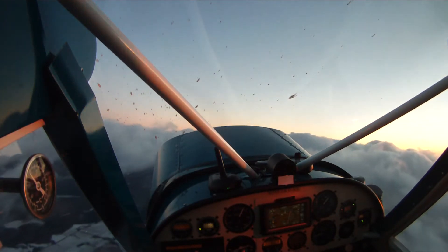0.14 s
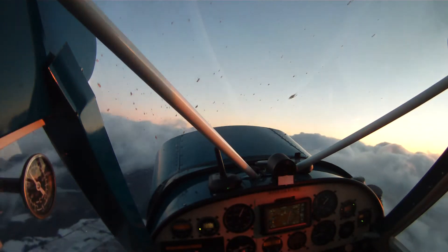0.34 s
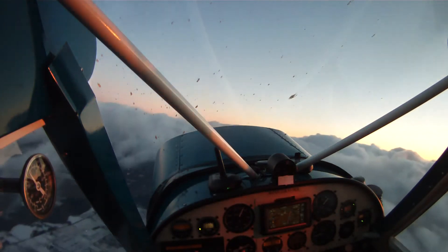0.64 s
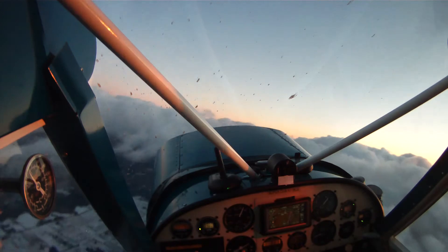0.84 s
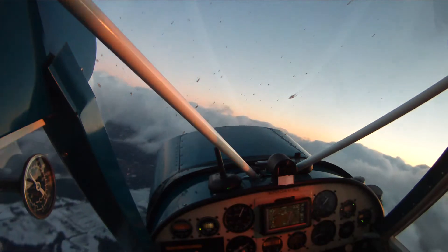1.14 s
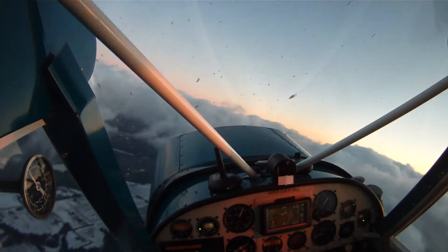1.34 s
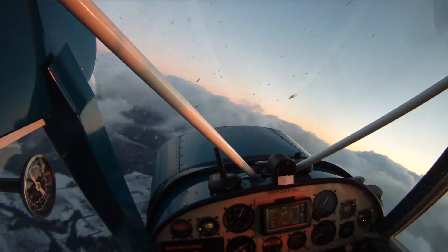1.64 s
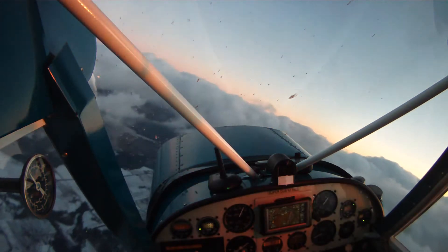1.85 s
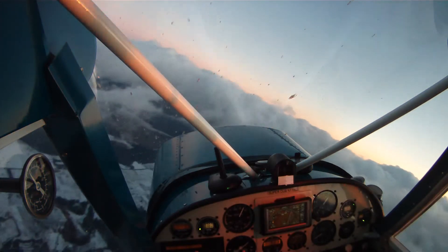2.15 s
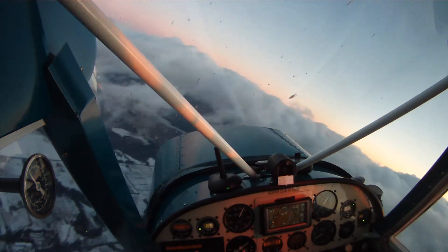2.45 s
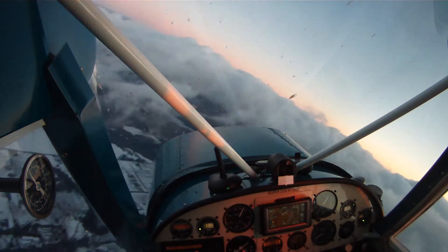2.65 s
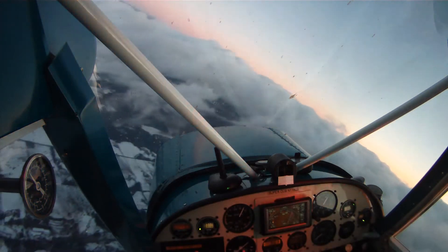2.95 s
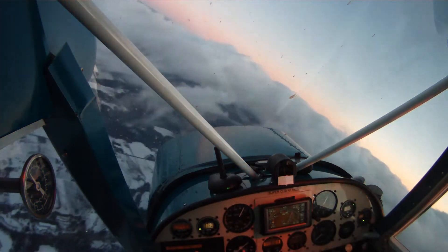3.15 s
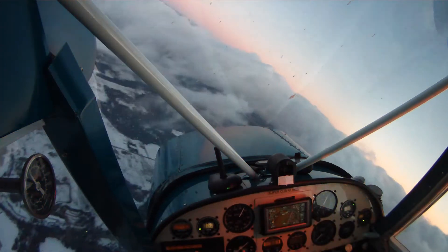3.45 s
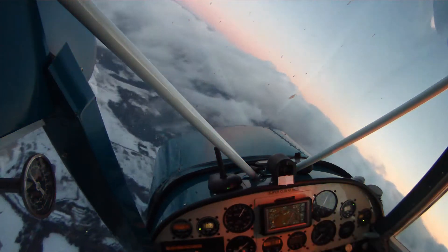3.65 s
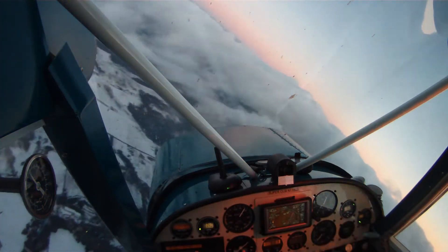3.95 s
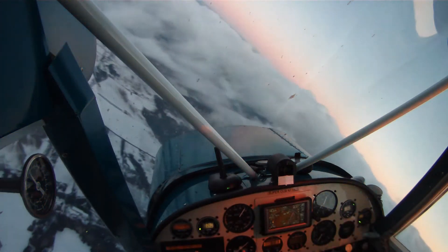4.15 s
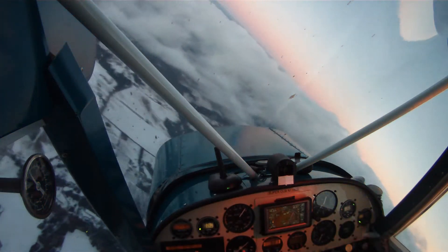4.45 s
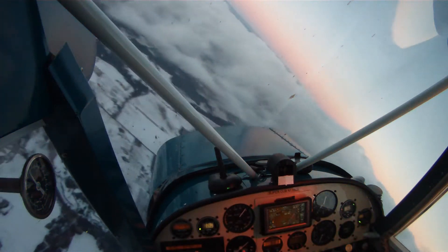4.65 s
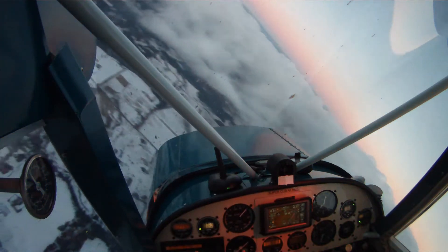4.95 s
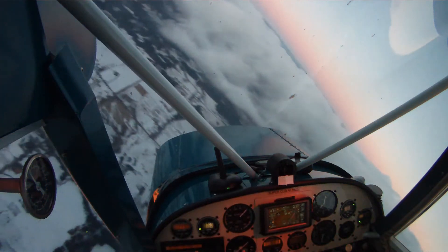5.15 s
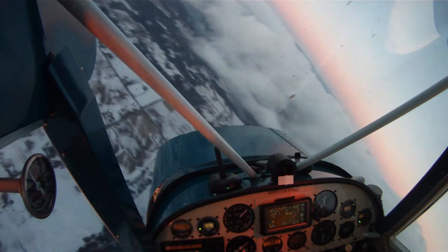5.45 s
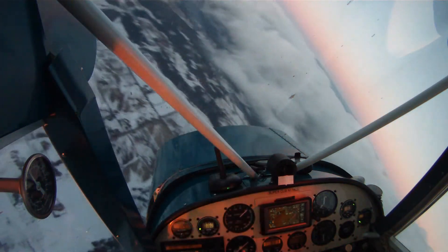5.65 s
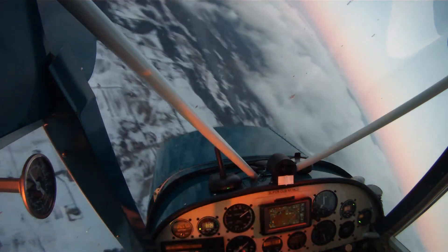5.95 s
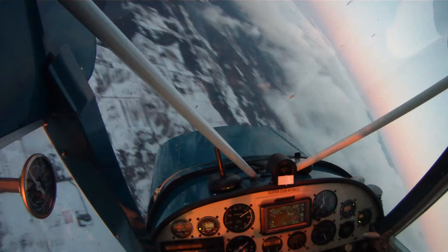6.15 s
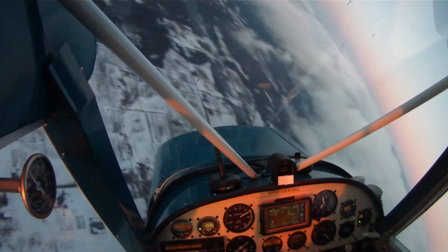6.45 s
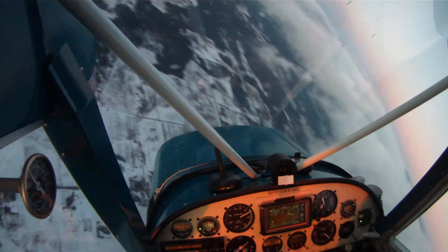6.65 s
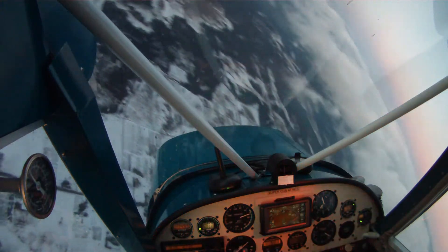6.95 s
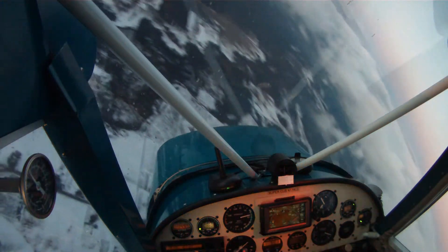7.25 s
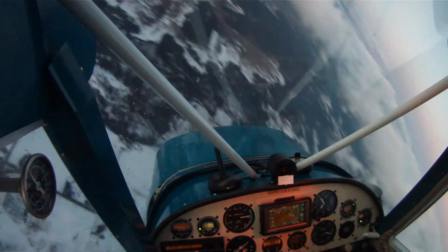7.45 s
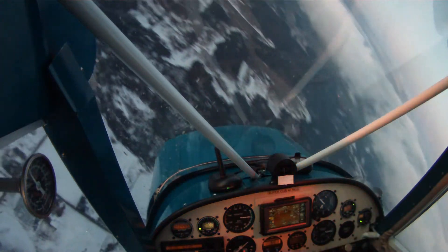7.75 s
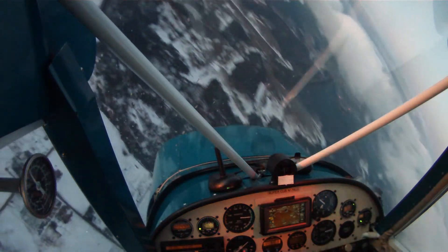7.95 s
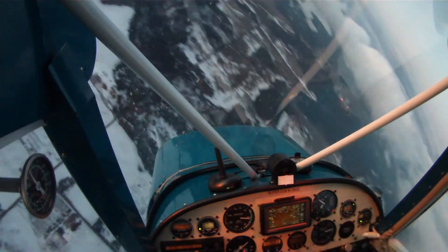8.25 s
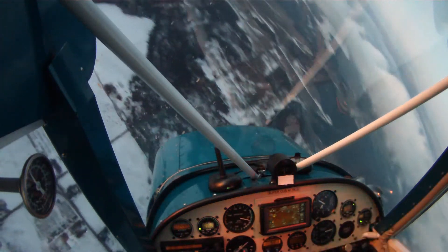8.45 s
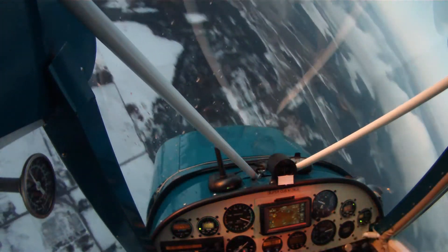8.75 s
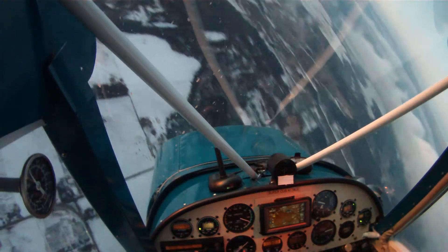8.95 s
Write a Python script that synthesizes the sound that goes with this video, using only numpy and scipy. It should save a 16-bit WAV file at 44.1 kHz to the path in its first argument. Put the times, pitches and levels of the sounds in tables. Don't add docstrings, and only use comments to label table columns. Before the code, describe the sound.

A light aircraft banks into a descending turn, heard from a microphone in the cramped cabin. Rushing slipstream throbs gently with the propeller's low drone, which sags and later winds up. Buffeting sets trim chattering and panels clattering hard between one and three seconds, then sporadically until about six. Very faint airy whistles come and go midway; the close is steadier, softer wind and hum.

```python
import sys
import numpy as np
from scipy import signal
from scipy.fft import rfft, irfft
from scipy.io import wavfile
from scipy.ndimage import uniform_filter1d

SR = 44100
rng = np.random.default_rng(int(sys.argv[2]) if len(sys.argv) > 2 else 0)


def invert_db(x):
    u = np.asarray(x, float) / 20
    return 10 ** u


def int16_out(signal):
    q = np.round(np.clip(np.atleast_2d(signal).T, -1, 1) * 32767)
    wavfile.write(sys.argv[1], SR, q.astype(np.int16))


N = 401751
TIME = np.arange(N) / SR
# (time [s], blade rate [Hz])
BLADE_RATE = [(0, 32.7), (.5, 31.94), (1, 29.64), (1.5, 26.04), (2.5, 25.12), (3.5, 24.63), (4.5, 24.88),
              (5.5, 26.44), (6.5, 28.16), (7.5, 30.68), (9.11, 35.44)]
# (time [s], level [dB], lead of the buffet on the blade pass [turns])
TRIM_CHATTER = [
    (0, -62.5, 0.07),
    (.9, -65.5, 0.014),
    (1.3, -55, .07),
    (2.2, -58, 0.19),
    (3.4, -57.5, -.6),
    (4.2, -57.5, -.6),
    (5.4, -63.5, -.55),
    (7.4, -68, -0.46),
    (9.11, -84, -0.58),
]


def slipstream(patchy_db=0.5, gust_db=0.75, throb_db=1.0):
    # (low edge [Hz], high edge [Hz])
    region_edges = [(110, 560), (560, 2600), (2600, 5200), (6300, 12000)]
    frames, fine = N // 128 + 9, np.fft.rfftfreq(N, 1 / SR)
    hz = np.fft.rfftfreq(512, 1 / SR)
    power = cabin_power(fine)
    coloured = irfft(rfft(rng.standard_normal(N)) * np.sqrt(power), N)
    z = signal.stft(coloured, nperseg=512, noverlap=384)[2]
    t = np.arange(z.shape[1]) * 128 / SR

    scale_db = 10 * np.log10(np.mean(coloured ** 2) / power.sum())
    plain_db = [scale_db + 10 * np.log10(power[(fine > lo) & (fine < hi)].sum()) for lo, hi in region_edges]
    air_db = np.array(air(t))
    lift_db = air_db - np.array(plain_db)[:, None]
    place = np.interp(np.log(hz + 1), np.log([450, 700, 2200, 3000, 4600, 6300]), [0, 1, 1, 2, 2, 3])
    blend = np.maximum(1 - abs(place[:, None] - np.arange(4)), 0)

    patches = rng.standard_normal((frames, 257)).T[:, :len(t)]
    patches = evened(uniform_filter1d(uniform_filter1d(patches, size=8, axis=0), size=16, axis=1))
    gusts = evened(uniform_filter1d(rng.standard_normal(frames), size=10))[:len(t)]
    throb = np.cos(2 * np.pi * np.interp(t, TIME, buffet_turns()))
    shared = np.clip(place, .6, 1)[:, None] * np.clip(3.4 - place, 0, 1)[:, None]

    rumble_share = np.clip(np.log2(210 / (hz + 1)), 0, 1.2)[:, None]
    rumble_db = rumble_share * (0.43 * (air_db[3] + 61.7) + 3.0 - 0.26 * t)
    field_db = rumble_db + blend @ lift_db + patchy_db * patches
    field_db = field_db + shared * (gust_db * gusts + throb_db * throb)
    return signal.istft(z * invert_db(field_db), nperseg=512, noverlap=384)[1][:N]


def air(t):
    # (time [s], strength of the flow [dB], lean to the bass [dB])
    flow = [(0.0, -54, -0.5), (0.91, -55, 0), (1.19, -50.5, -1.5), (1.32, -49.5, 2.5), (1.47, -46, 0),
            (1.88, -43.5, -0.5), (2.08, -48.5, -0.5), (3.4, -44, 0.5), (3.55, -45.5, -1.5),
            (4.8, -47, -0.5), (5.48, -45, 0.5), (5.81, -47.5, 1), (6.24, -45, 0.5), (7.41, -50, 0),
            (7.91, -52.5, 0), (8.47, -52.5, 1.5), (8.63, -51, -2.5), (9.11, -53, 3.5)]
    # (level over the flow [dB], share of its swell [ratio],
    # share of its lean [ratio], share of the gusts [ratio], gain as speed builds [dB/s])
    regions = [(11.5, 0.92, 1.02, 0.83, -0.0271), (-0.07, 1.03, .1, 0.17, -0.0322),
               (-8.5, 1.06, -.1, 0.29, 0.04), (-28, 1.03, -.2, 0.23, 0.5)]
    # (time [s], change [dB], half length [s])
    surges = [(.3, 1.5, 0.25), (1.56, 0.5, 0.1), (1.7, -1.5, 0.038), (2.2, -2, 0.071), (2.4, 1.5, 0.041),
              (2.68, -1, 0.079), (4.16, 0.5, 0.091), (5.12, 1, 0.11), (5.63, 2, 0.063), (5.88, -2, .05),
              (6.19, 1.5, 0.059), (6.58, -2, 0.046), (6.75, 2, 0.037), (7.59, 1, .04), (8.78, 0, 0.12)]
    # (time [s], change [dB], half length [s])
    gusts = [(0.961, 9, 0.023), (1.397, 4.5, 0.033), (1.555, 4.5, 0.064), (1.83, 6, 0.043),
             (1.98, 6.5, 0.015), (2.543, 5.5, 0.041), (3.224, 3.5, 0.11), (3.544, 5.5, 0.099),
             (4.16, 1.5, 0.03), (4.75, 0.5, 0.019), (5.12, 2.5, 0.12), (5.595, 4, 0.016), (5.881, -2, .03),
             (5.96, 7.5, 0.013), (5.99, -12, 0.012), (6.042, 11.5, 0.011), (6.726, 1.5, 0.017),
             (7.574, 4, 0.043), (8.097, 3.5, 0.021), (8.802, 3.5, 0.022)]
    calm_db = -49.5
    flow_db, lean_db = curves(flow, t)
    surge_db = sum(db * bump(t, s, half) for s, db, half in surges)
    gust_db = sum(db * bump(t, s, half) for s, db, half in gusts)
    swell_db = flow_db + surge_db - calm_db
    return [calm_db + db + swell * swell_db + lean * lean_db + gust * gust_db + db_per_s * t
            for db, swell, lean, gust, db_per_s in regions]


def cabin_power(hz):
    # (frequency [Hz], width [Hz], level [dB])
    modes = [(126.7, 58, -15.5), (180, 34.5, -8), (237, 56.3, -0.56), (260, 24, -31), (353.5, 166, -11.5),
             (436.3, 72, -8), (485, 48.3, -7.5), (629, 41, -25), (731, 182, -19.5), (868, 115, -19.5),
             (1192, 143, -21.5), (1444, 102, -23), (1747, 207, -24.5), (2089, 162, -24.5), (2295, 144, -27),
             (2867, 57, -29.5), (3075, 420, -28), (3400, 100, -28), (3600, 94, -39), (3818, 660, -29),
             (4500, 106, -35.5), (4750, 190, -38.5), (4930, 280, -40), (5560, 836, -44.5),
             (7050, 2000, -53), (8500, 760, -54.5)]
    # (frequency [Hz], level [dB])
    valleys = [(22, -45), (34, -21), (60, -32), (100, -19.5), (300, -15.5), (530, -37), (1000, -26.5),
               (2000, -36.5), (2600, -39.5), (3500, -48.5), (5200, -58.5), (9000, -60), (12000, -67),
               (15000, -69.5)]
    # (frequency [Hz], width [Hz], level [dB])
    length_mode = (228.7, 18, -4)
    f, level_db = np.transpose(valleys)
    power = invert_db(2 * np.interp(np.log(hz + 1), np.log(f), level_db))
    for centre, width, db in list(modes) + [length_mode]:
        power += invert_db(2 * db) / (1 + (2 * (hz - centre) / width) ** 2) ** 2
    return power


CABIN_HZ = np.fft.rfftfreq(4096, 1 / SR)
CABIN_DB = 10 * np.log10(cabin_power(CABIN_HZ))


def blade_turns():
    return np.cumsum(curves(BLADE_RATE)[0]) / SR


def buffet_turns():
    return blade_turns() + curves(TRIM_CHATTER)[1]


def propeller():
    # (level at the middle rate [dB], gain per blade rate [dB/Hz])
    low_orders = [(-58.5, 0.3), (-67, 0.34), (-68.5, .5), (-63.5, 0.7)]
    # (order [number], level against the buffet [dB])
    high_orders = [(5, -8), (6, -12), (7, -7.5), (8, -12), (9, -9), (10, -21)]
    # (frequency [Hz], width [Hz], lift [dB])
    panel_hz, width, panel_db = (76, 7.5, 11.4)
    turns, rate = blade_turns(), curves(BLADE_RATE)[0]
    middle_hz, waver_db = 28.5, 1.5
    levels_db = []
    for order, (db, db_per_hz) in enumerate(low_orders, 1):
        lift_db = panel_db * bump(order * rate, panel_hz, width)
        levels_db.append(db + db_per_hz * (rate - middle_hz) + lift_db + waver_db * waver(count=14))
    buffet_db = uniform_filter1d(air(TIME)[0], size=8000)
    for order, db in high_orders:
        cabin_db = np.interp(order * rate, CABIN_HZ, CABIN_DB)
        levels_db.append(db - 1.5 + 5.4 * waver(count=60) + cabin_db + buffet_db)
    hum = np.zeros(N)
    for order, db in enumerate(levels_db, 1):
        hum += np.sqrt(2) * invert_db(db) * np.sin(2 * np.pi * (order * turns + rng.random()))
    return hum + airframe_shudder()


def airframe_shudder():
    # (middle [s], half length [s], level [dB])
    swells = [
        (.1, .4, -56),
        (1.75, .55, -54),
        (4.2, 1, -56),
        (5.761, .25, -56),
        (6.54, .18, -55),
        (7.55, 0.34, -58),
        (8.9, 0.57, -56),
    ]
    rest_db = -66
    tone = evened(resonate(rng.standard_normal(N), 42.5, 8))
    return (invert_db(rest_db) + sum(invert_db(db) * bump(TIME, s, half) for s, half, db in swells)) * tone


def panels():
    # (time [s], peak [dB], dull thud re peak [dB], loudest panel mode [Hz])
    slaps = [(.6509, -36.5, -10, 3390), (.6774, -40, -14, 2110), (.7766, -33.5, -6, 2130),
             (.9423, -34, -10, 3330), (.9772, -38.5, -8, 3240), (1.0141, -41, -10, 2110),
             (1.047, -37.5, -16, 2120), (1.1508, -28, -8, 2130), (1.1942, -25, -14, 3400),
             (1.2331, -27, -2, 2090), (1.3049, -25, -1, 2130), (1.3329, -17.5, -14.5, 3420),
             (1.4007, -19, -6, 3440), (1.4346, -27.5, -9, 3420), (1.4795, -22.5, -7.5, 2120),
             (1.5095, -20.5, -11, 3330), (1.5524, -27, -12, 2110), (1.7499, -26.5, -6, 3380),
             (1.9789, -22, -9.5, 2120), (2.1974, -39, -1, 2920), (2.2478, -34, -6, 2920),
             (2.2892, -21.5, -5, 2120), (4.5855, -31, 0, 2170), (4.9761, -26.5, 5, 2120),
             (5.2954, -28.5, -10, 2120), (5.3358, -27, -1, 2130), (5.5288, -28, -9, 2120),
             (5.679, -26, -4, 2096), (5.9798, -24.5, -4.5, 2110), (6.0227, -25.5, -8, 2120)]
    # (time [s], peak [dB], ping re peak [dB], loudest panel mode [Hz])
    pings = [(.2414, -33.5, -10, 2300), (.2793, -34, -6.5, 2080), (.3661, -35, -9, 3410),
             (1.0814, -36, -5, 2120), (1.1169, -25.5, -11, 2120), (1.2575, -23, -12, 2093),
             (1.8292, -22.5, -4, 3385), (1.8662, -19.5, -9, 2105), (1.917, -28, -6, 3413),
             (2.0208, -25.5, -7, 3510), (2.0577, -26.5, -12, 2100), (2.3306, -23, -16, 3514),
             (2.4079, -29.5, -11, 3225), (2.4563, -28.5, -16, 3500), (2.4927, -21.5, -8.5, 2110),
             (2.5436, -28, -8, 2156), (2.8175, -31.5, -3.5, 3500), (2.8619, -25, -6, 2102),
             (2.9008, -27.5, -9.5, 2107), (2.9826, -35, 0, 2950), (3.027, -35.5, -1.5, 2093),
             (3.0989, -30, -5, 3382), (3.1438, -25, -5.5, 2160), (3.1882, -29, -1, 2110),
             (3.2655, -22.5, -9.5, 2120), (3.3074, -24, -11.5, 2117), (3.8447, -30.5, -8, 2980),
             (4.2677, -29.5, -10, 3500), (6.6059, -31.5, -11, 3250), (7.278, -31.5, -8, 2152)]
    bounce_s, bounce_db = .012, -11
    ping_bright_db, ping_dull_db = -24, -4
    out = np.zeros(N)
    for s, db, dull_db, mode_hz in slaps:
        add(out, s, invert_db(db - 2.5) * knock(-22, -19.5, dull_db, mode_hz))
    for s, db, ping_db, mode_hz in pings:
        add(out, s, invert_db(db - 2.0) * knock(ping_db, ping_bright_db, ping_dull_db, mode_hz))
    for s, db, _, mode_hz in list(slaps) + list(pings):
        add(out, s + bounce_s, invert_db(db + bounce_db) * knock(-7.0, ping_bright_db, ping_dull_db, mode_hz))
    return out


def knock(ping_db, bright_db, dull_db, mode_hz, contact_s=.004):
    # (frequency [Hz], level [dB])
    slap_colour = [(200, -21.5), (500, 0), (900, -0.5), (2000, 1.5), (3300, 3), (4900, 0.5), (6000, -8),
                   (7200, -6), (9000, -27), (15000, -35)]
    # (frequency [Hz], width [Hz], level [dB])
    plate_modes = [(3560, 110, 0), (3640, 110, -2), (3900, 130, -8)]
    t = np.arange(1200) / SR
    blow = rng.standard_normal(1200) * np.exp(-t / contact_s) * np.minimum(t / .0013, 1)
    f, slap_db = np.transpose(slap_colour)
    colour_db = np.interp(np.log(CABIN_HZ + 1), np.log(f), slap_db)
    tilt_db = np.interp(CABIN_HZ, [1270, 1850, 4120, 4660], [dull_db + 9.5, 0, 0, bright_db + 26.0])
    mode_db = 9.8 / (1 + ((CABIN_HZ - mode_hz) / 130.0) ** 2)
    body = signal.fftconvolve(blow, causal(CABIN_DB + colour_db + tilt_db + mode_db))
    padded = np.pad(blow * np.exp(-t / contact_s), (0, len(body) - len(blow)))
    plate = sum(invert_db(db) * resonate(padded, centre, width) for centre, width, db in plate_modes)
    share = invert_db(min(ping_db + 0.5, -.3))
    return 0.14 * (np.sqrt(1 - share ** 2) * evened(body) + share * evened(plate))


def chatter(spread_db=5.0, late_s=.008):
    # (frequency [Hz], width [Hz], level [dB])
    trim_parts = [(2120, 220, -5), (2942, 150, 3), (3250, 280, -3), (3420, 180, 1), (3527, 160, 2),
                  (3934, 170, -3.5), (4620, 260, -16), (4850, 260, -4.5)]
    beats = np.flatnonzero(np.diff(np.floor(buffet_turns() + .2)))
    late, force = rng.random((len(beats), len(trim_parts), 2)).T
    t, out = np.arange(1200) / SR, np.zeros(N)
    for k, (centre, width, db) in enumerate(trim_parts):
        hits = np.zeros(N)
        places = np.minimum(beats + (late[k] * late_s * SR).astype(int), N - 1)
        hits[places] = invert_db(db + spread_db * np.log(force[k] + .01))
        buzz = signal.oaconvolve(hits, t * np.exp(-t / 0.0031))[:N] * rng.standard_normal(N)
        out += resonate(buzz, centre, width) / np.sqrt(width)
    return invert_db(curves(TRIM_CHATTER)[0]) * evened(out)


def leaks():
    # (time [s], frequency [Hz], level [dB])
    low_whistle = [
        (4.2, 10500, -104),
        (4.6, 10700, -93),
        (5.2, 11000, -93),
        (5.45, 11700, -89),
        (5.9, 11900, -91),
        (6.3, 12400, -95),
        (6.7, 12700, -108),
    ]
    # (time [s], frequency [Hz], level [dB])
    high_whistle = [
        (3, 14200, -106),
        (4.1, 14400, -96),
        (4.7, 14550, -92),
        (5.15, 14800, -94),
        (5.6, 14500, -104),
        (6.3, 14300, -97),
        (7, 14600, -97),
        (7.75, 14600, -104),
    ]
    # (time [s], level [dB])
    tick_s, tick_db = (7.278, -64)
    out = np.zeros(N)
    for rows in (low_whistle, high_whistle):
        hz, db = curves(rows)
        out += invert_db(db) * evened(resonate(rng.standard_normal(N), hz, 300))
    snap = rng.standard_normal(500) * np.exp(-np.arange(500) / SR / .005)
    snap = resonate(resonate(snap, 8200, 7000), 8200, 7000)
    add(out, tick_s, invert_db(tick_db) * evened(snap))
    return out


def resonate(x, hz, width):
    turn = np.exp(2j * np.pi * np.cumsum(hz * np.ones(len(x))) / SR)
    r = np.exp(-np.pi * width / SR)
    low = signal.lfilter([1 - r], [1, -r], x / turn)
    low = signal.lfilter([1 - r], [1, -r], low)
    return 2 * (turn * low).real


def causal(gain_db):
    log_gain = np.log(invert_db(np.r_[gain_db, gain_db[-2:0:-1]]))
    return np.fft.ifft(np.exp(np.conj(signal.hilbert(log_gain)))).real[:1500]


def evened(x):
    return x / np.sqrt(np.mean(x ** 2) + 1e-20)


def curves(rows, t=TIME):
    s, *columns = np.transpose(rows)
    return [np.interp(t, s, c) for c in columns]


def bump(t, middle, half):
    return np.exp(-((t - middle) / half) ** 2)


def waver(count):
    return np.interp(TIME, np.linspace(0, TIME[-1], count), rng.standard_normal(count))


def add(mix, s, sound):
    part = mix[round(s * SR):][:len(sound)]
    part += sound[:len(part)]


def scene():
    return (slipstream() + propeller() + panels() + chatter() + leaks())[None]


def roll_off(x):
    return signal.sosfilt(signal.butter(12, 14980, fs=SR, output="sos"), x)


def record(dry):
    # (frequency [Hz], level [dB per bin])
    threshold = [(9000, -135), (10000, -119), (12600, -115), (12800, -106), (15000, -107.5)]
    hz, _, z = signal.stft(dry, SR, nperseg=1024, noverlap=768)
    power = uniform_filter1d(uniform_filter1d(abs(z) ** 2, size=5, axis=1), size=4, axis=2)
    edge_hz, floor_db = np.transpose(threshold)
    kept = power > invert_db(2 * np.interp(hz, edge_hz, floor_db))[:, None]
    mix = signal.istft(z * kept, SR, nperseg=1024, noverlap=768)[1][:, :N]
    return roll_off(mix)


dry = scene()
out = record(dry)
int16_out(out)
```